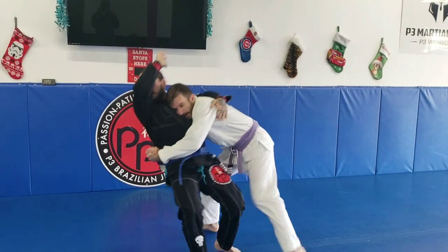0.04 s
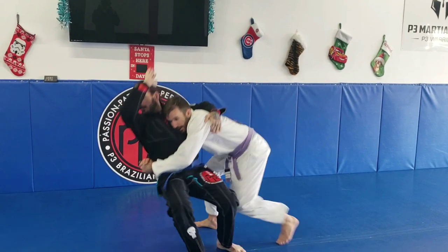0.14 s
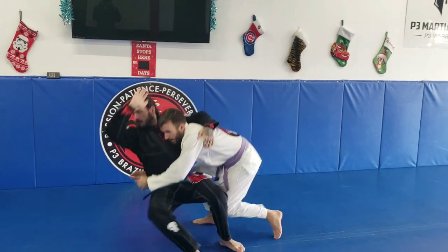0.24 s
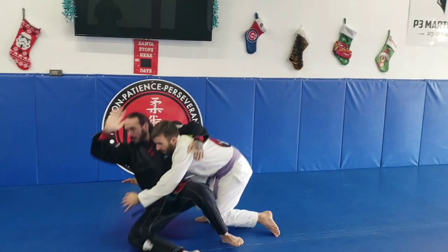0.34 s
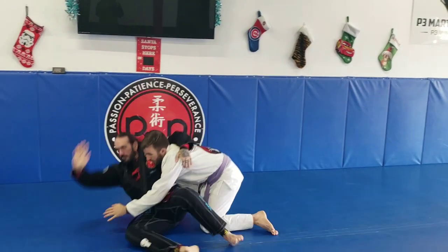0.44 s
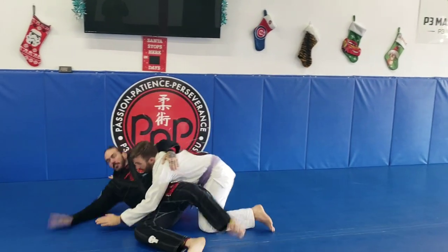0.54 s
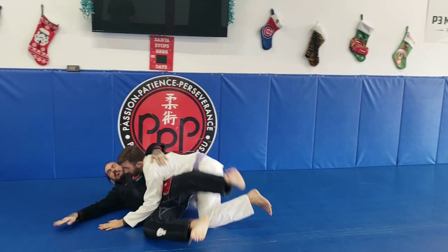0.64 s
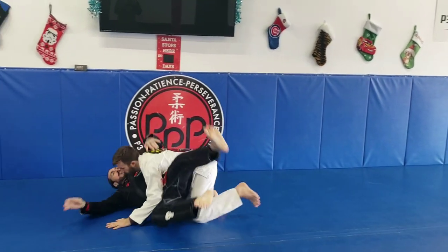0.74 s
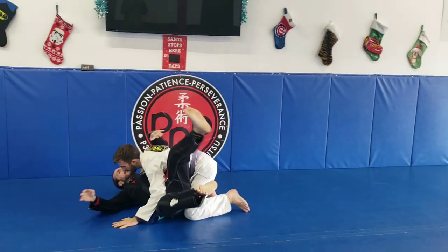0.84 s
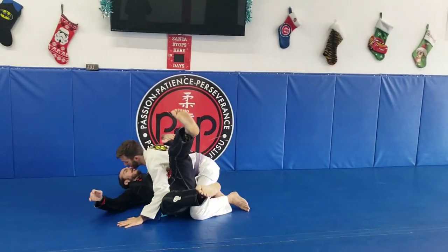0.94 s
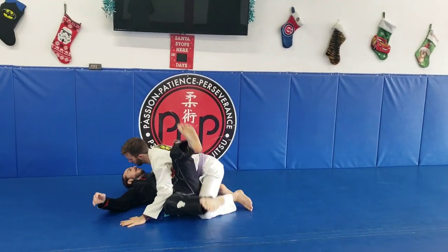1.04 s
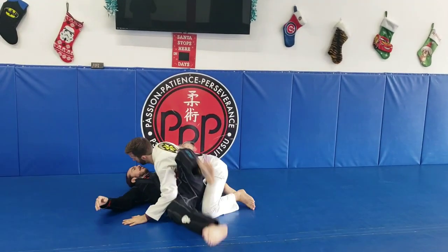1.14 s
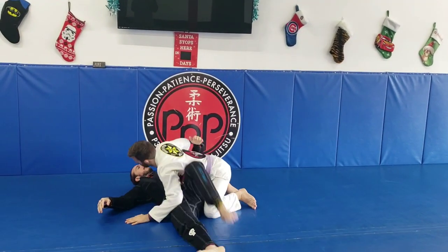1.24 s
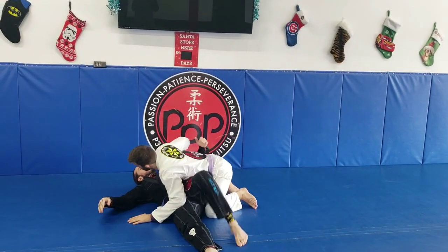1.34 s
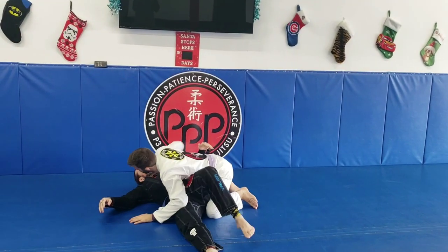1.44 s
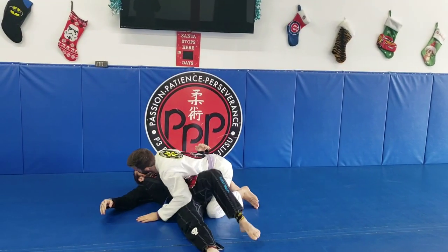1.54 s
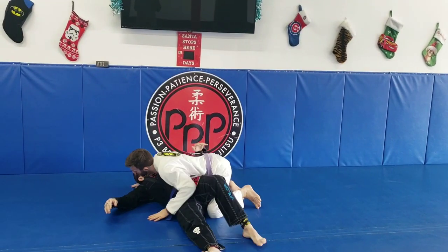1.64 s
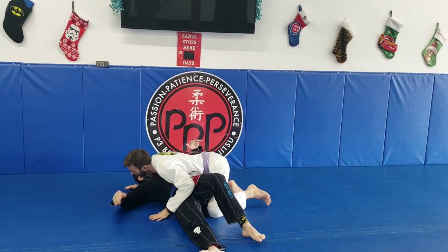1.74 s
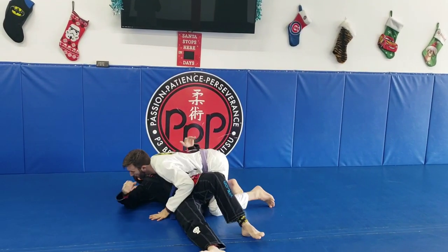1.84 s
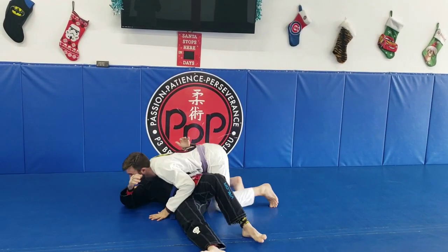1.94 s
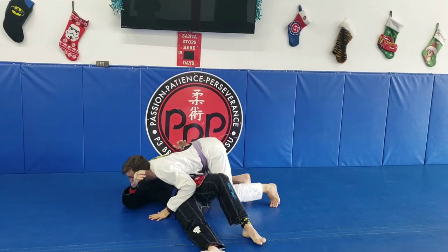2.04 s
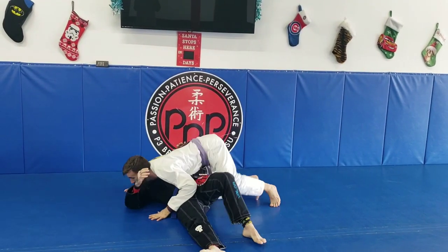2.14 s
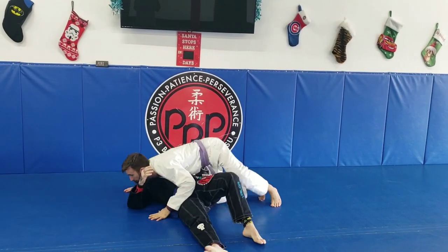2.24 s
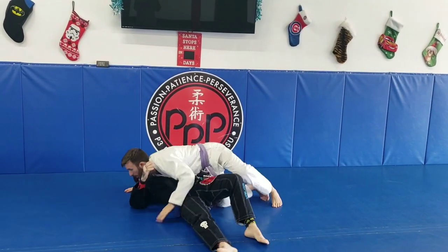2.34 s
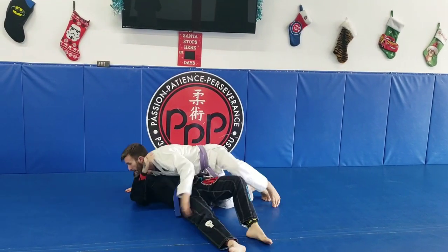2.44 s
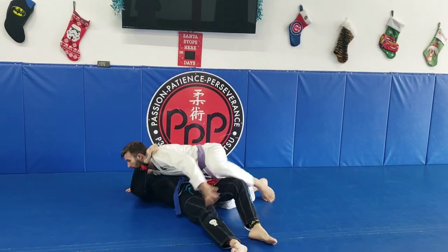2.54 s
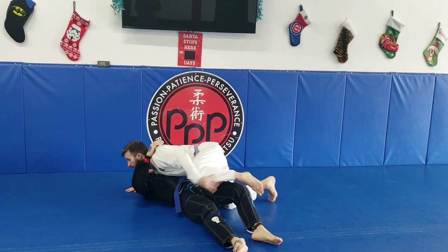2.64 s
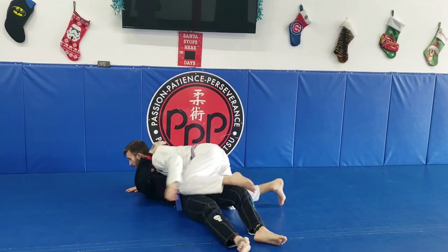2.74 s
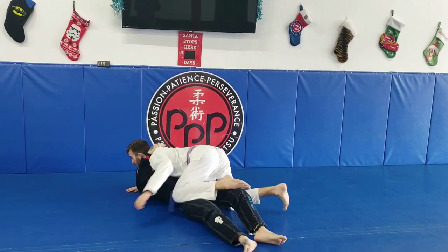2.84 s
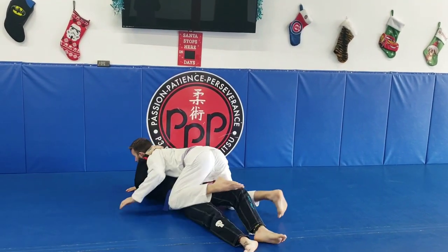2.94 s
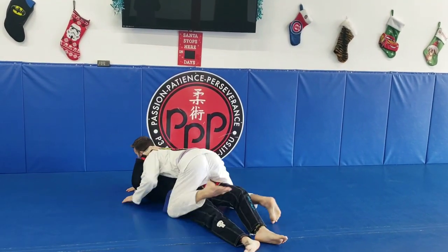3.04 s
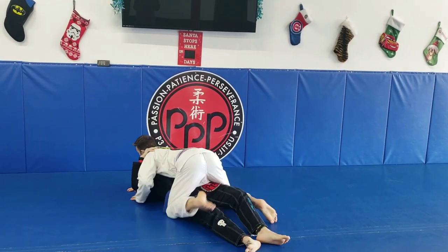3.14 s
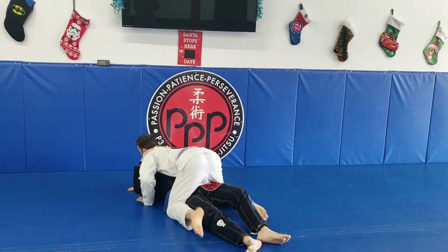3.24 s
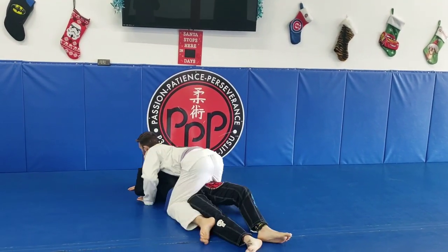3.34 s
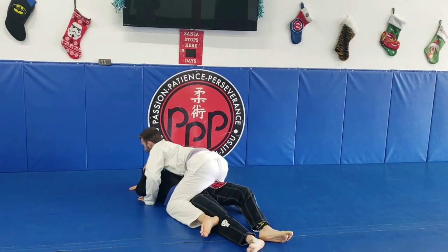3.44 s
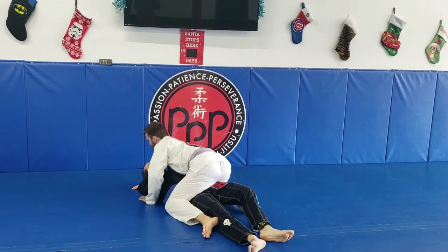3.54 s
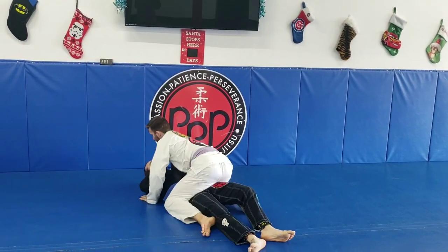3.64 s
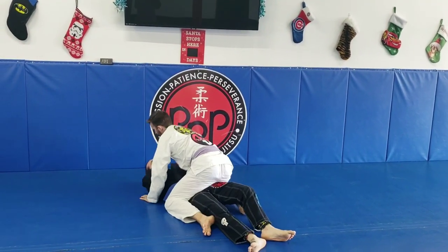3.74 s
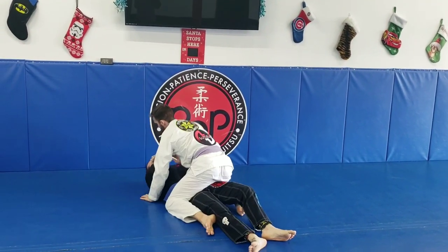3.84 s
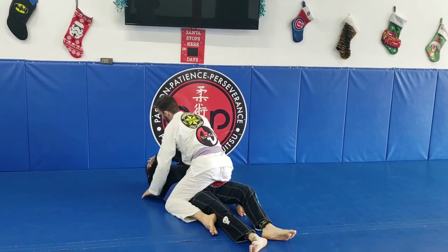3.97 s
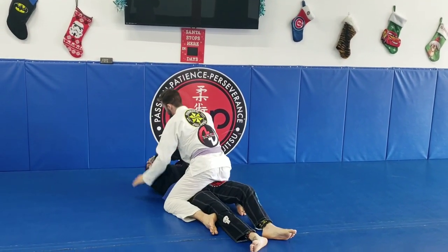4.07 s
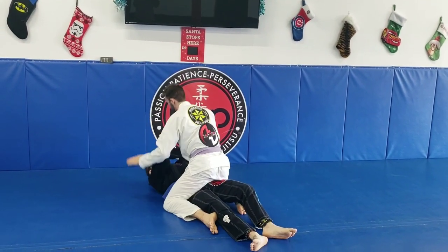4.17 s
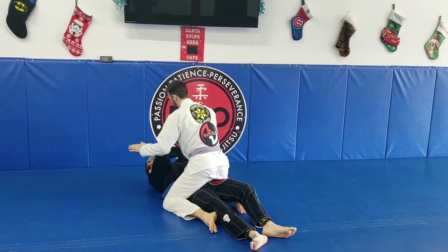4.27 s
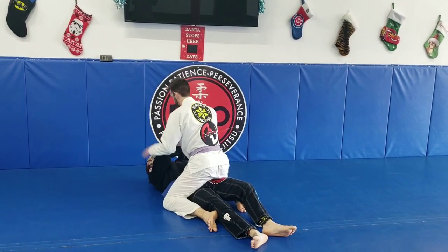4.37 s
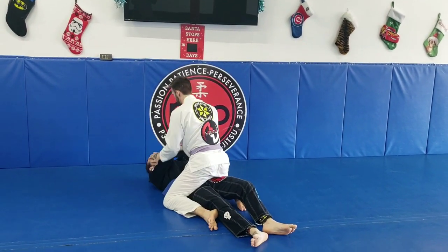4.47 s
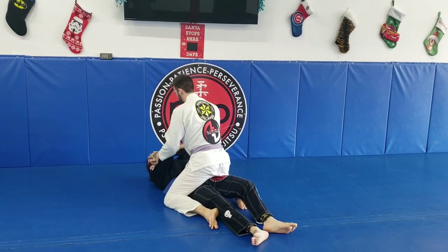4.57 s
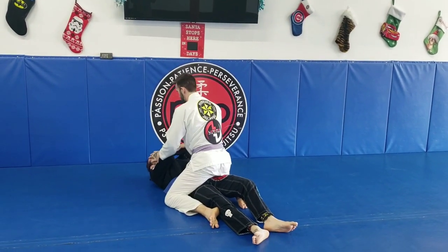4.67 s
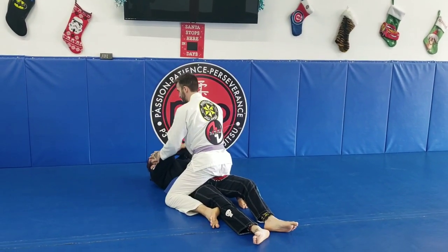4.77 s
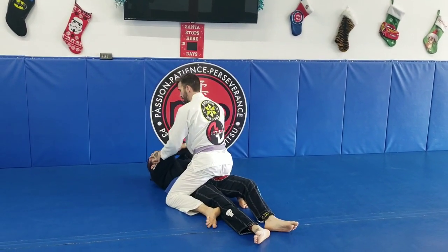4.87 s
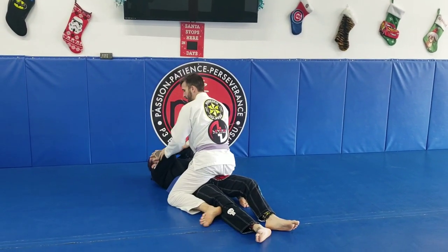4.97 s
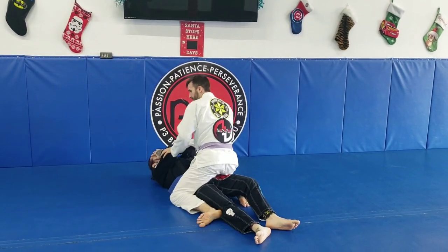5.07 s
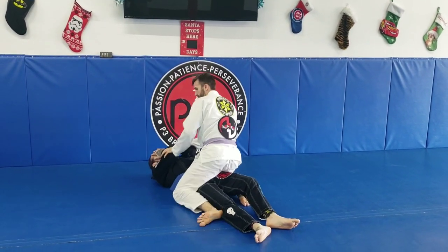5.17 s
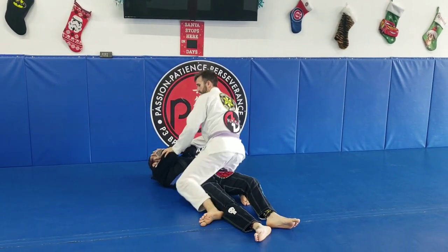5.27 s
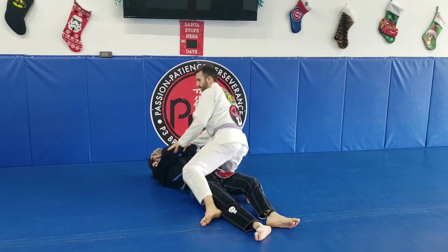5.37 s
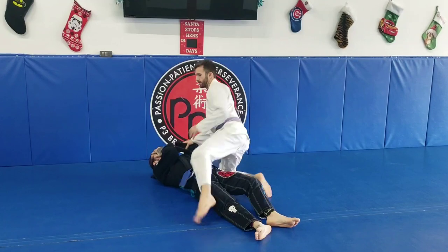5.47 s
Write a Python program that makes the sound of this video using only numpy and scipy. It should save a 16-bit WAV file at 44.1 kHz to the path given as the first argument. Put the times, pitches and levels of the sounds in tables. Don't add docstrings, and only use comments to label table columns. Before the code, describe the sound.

A phone some distance away hears a takedown on a padded sprung floor: soft steps, knee and hip thuds, then one overwhelming slam with a flat arm smack and a boomy hall tail. A double knock comes shortly after, followed by gentle limb taps, short scuffs, sleeves rubbing and hand pats while the bodies shift, over quiet air rumble and hiss.

```python
import sys
import numpy as np
from scipy import signal
from scipy.fft import rfft, irfft, next_fast_len
from scipy.io import wavfile
from scipy.ndimage import uniform_filter1d, map_coordinates

SR = 44100
rng = np.random.default_rng(int(sys.argv[2]) if len(sys.argv) > 2 else 0)


def invert_db(level):
    return 10 ** (np.asarray(level, dtype=float) / 20)


def store_pcm(level_fs):
    pcm = np.round(np.clip(level_fs, -1, 1) * 32767).astype(np.int16)
    wavfile.write(sys.argv[1], SR, np.atleast_2d(pcm).T)


N = 242991

# frequency_hz, level_db (per Hz)
AIR_SPECTRUM = [(15, -39.5), (25, -2.5), (54, -2.5), (86, 4.5), (108, -8.5), (146, -3.5), (168, -15),
                (249, -14), (300, -19), (400, -37), (520, -59), (880, -120)]
# frequency_hz, level_db (per Hz)
HISS_SPECTRUM = [(4410, -32), (7500, -2), (8970, -0.5), (12700, 4), (14000, 1.5), (14800, -11)]
# frequency_hz, level_db (per Hz)
DRAG_SPECTRUM = [(88, -34), (150, 3.5), (361, 0.5), (494, -0.5), (641, -6), (877, -6.5), (1200, -23),
                 (1560, -55.5), (2640, -120)]
# frequency_hz, level_db (per Hz)
CLOTH_SPECTRUM = [(410, -27.5), (700, -7.5), (881, -3.5), (1220, -4.5), (1560, -5), (1850, -6.5),
                  (2030, -7), (3800, -8.5), (6550, -12.5), (8500, -35.5), (11000, -59.5), (18700, -120)]
# frequency_hz, level_db (per Hz)
SKIN_SPECTRUM = [(300, -28.5), (480, 2.5), (700, 0), (1000, -1), (1300, -1.5), (1650, -6.5), (2200, -4),
                 (2800, -6), (4000, -8.5), (6700, -15), (7700, -30), (10500, -24), (12000, -20.5),
                 (14500, -30.5)]
# time_s, cloth_level_db
EFFORT = [(0, -66), (.44, -64.5), (.62, -67), (0.869, -57.5), (1.1, -65.5), (1.29, -71), (1.55, -65.5),
          (1.8, -69.5), (2.101, -68), (2.501, -69.5), (3.198, -70), (3.64, -67), (3.84, -70.5),
          (4.08, -67.5), (4.261, -77.5), (4.47, -83), (4.66, -69.5), (4.85, -78)]
# frequency_hz, t60_s
HALL_T60 = [(60, 0.52), (130, 1), (300, 0.74), (600, 0.38), (1200, 0.8), (2000, .85), (4000, 0.98),
            (6000, 0.76), (9000, 0.57), (14000, 0.44)]
# frequency_hz, gain_db
HALL_GAIN = [(40, -7.5), (70, -1.5), (100, -4.5), (135, 1), (180, 3), (240, 0), (330, 1.5), (450, 2.5),
             (600, -3), (1500, -14), (8000, -1.5)]
# frequency_hz, correlation (-1 to 1)
LIKENESS = [(60, 0.99), (130, 0.94), (290, 0.92), (630, 0.22), (1370, 0.26), (2990, -0.27), (6550, 0.058),
            (14300, -0.2)]
# frequency_hz, left_minus_right_db
PORT_BALANCE = [(60, 3), (110, 1), (200, 1.5), (370, -2), (680, -1), (1260, -5), (2310, -9.5), (4240, -12),
                (7790, -5), (14300, 3)]
# start_s, peak_db, length_s, dullness_db (per octave), hall_db
SLAPS = [
    (0.532, -50.5, 0.0081, -4.5, 6),
    (0.628, -21.5, 0.0066, -2.65, 5.5),
    (1.335, -51, 0.0083, -4.5, 1),
    (2.705, -52, 0.0081, 1.5, 2),
    (5.05, -67, 0.18, -6, 5.5),
    (5.404, -65, 0.16, -5, 4.5),
]
# start_s, peak_db, length_s, dullness_db (per octave), hall_db
SCUFFS = [
    (.055, -51, 0.012, 17, -7),
    (0.168, -49, 0.007, -2.5, 7.5),
    (1.303, -45, 0.01, 0, 6),
    (2.641, -63, 0.06, 4.5, 2.5),
    (3.352, -53.5, 0.12, 4, -5.5),
    (3.933, -59, 0.074, 3, -2.5),
    (4.049, -61.5, 0.018, 9, -3.5),
]
# start_s, peak_db, length_s, dullness_db (per octave), hall_db
PATS = [
    (.4405, -38.5, 0.013, 4.5, 3.5),
    (1.294, -39, 0.007, 4, -2),
    (1.391, -44.5, 0.0078, -3, 5.5),
    (1.704, -53.5, 0.012, -1, 3.5),
    (3.107, -64, .012, 10, 0),
    (4.479, -56.5, 0.04, 1, 11),
    (4.497, -47.5, 0.025, 3, 2),
]
# frequency_hz, level_db, t60_s
FLOOR_MODES = [(103, -13.5, 0.67), (141.2, -15, 1), (255, -12.5, 0.26), (335, -17, .35), (403, -13, 0.24)]
# start_s, peak_db, pitch_hz, boom_db (against the knock), hall_db
LANDINGS = [(0.03, -39.5, 445, -19, 9), (0.149, -35, 325, -7, 7), (0.168, -21, 217, -13, -10.5),
            (0.221, -32.5, 390, -5, 0), (.442, -18.5, 323, -7, 1.5), (0.46, -19, 300, -12.5, -6.5),
            (.525, -19, 308, -11.5, -8), (0.543, -26.5, 272, -22, -5), (0.6279, -2, 260, -11.5, -0.5),
            (.6352, 1, 198, -9.5, 0.5), (.722, -6, 352, -15, -4.5), (1.294, -21, 327, -11.5, 4.5),
            (1.306, -30.5, 298, 6.5, -24), (1.3894, -18, 412, -22.5, -9), (1.407, -18.5, 235, -22, -5)]
# start_s, peak_db, pitch_hz
TAPS = [(1.542, -39.5, 203), (1.7014, -30.5, 284), (2.69, -38, 335), (2.738, -40, 397), (3.108, -43.5, 327),
        (3.312, -47, 290), (3.397, -33, 292), (3.43, -43, 284), (3.919, -37, 348), (4.056, -50, 420),
        (4.488, -34, 203), (5.15, -52, 304), (2.499, -48, 348), (2.586, -46.5, 301), (2.651, -45, 347),
        (5.44, -54, 296)]


def unit(x):
    return x / np.sqrt(np.mean(x ** 2) + 1e-20)


def along(points, hz):
    f, v = np.transpose(points)
    return np.interp(np.log(hz + 1), np.log(f + 1), v)


def add(out, start_s, sound):
    out[:, round(start_s * SR):][:, :sound.shape[-1]] += sound


def filtered(x, response):
    size = next_fast_len(x.shape[-1] + 8192)
    spectrum = rfft(x, size) * response(np.fft.rfftfreq(size, 1 / SR))
    return irfft(spectrum, size)[..., :x.shape[-1]]


def wobble(rate_hz):
    knots = rng.standard_normal(int(N * rate_hz / SR) + 4)
    return map_coordinates(knots, [np.arange(N) * rate_hz / SR])


def diffuse(pair, colour):
    def angle(hz):
        return np.arccos(np.clip(along(LIKENESS, hz), -1, 1)) / 2
    mid, side = filtered(pair, lambda hz: colour(hz) * [np.cos(angle(hz)), np.sin(angle(hz))])
    return np.array([mid + side, mid - side])


def rush(spectrum, patchy_db):
    z = signal.stft(rng.standard_normal((2, N)), nperseg=512)[2]
    patches = uniform_filter1d(rng.standard_normal(z.shape[1:]), size=6, axis=0)
    patches = uniform_filter1d(patches, size=12, axis=1)
    pair = signal.istft(z * invert_db(patchy_db * unit(patches)), nperseg=512)[1][:, :N]
    return unit(diffuse(pair, lambda hz: invert_db(along(spectrum, hz))))


def hall(build_s, colour, gap_s):
    hz, t, z = signal.stft(rng.standard_normal((2, SR)), SR, nperseg=512)
    decay = invert_db(-60 * t / along(HALL_T60, hz)[:, None])
    tail = signal.istft(z * decay, SR, nperseg=512)[1]
    late = np.clip(np.arange(tail.shape[1]) / SR - gap_s, 0, None)
    tail = tail * (1 - np.exp(-late / build_s))
    return diffuse(tail / np.linalg.norm(tail[0]), colour) * (late > 0)


def aftermath(t60_s):
    kicks = np.zeros(N)
    for start_s, peak_db, *_ in LANDINGS:
        kicks[round(start_s * SR)] = invert_db(2 * peak_db)
    return signal.lfilter([1], [1, -invert_db(-120 / (t60_s * SR))], kicks)


def port_hiss():
    return invert_db(-78) * rush(HISS_SPECTRUM, patchy_db=0.9)


def ventilation():
    air_db, rumble_db, rumble_t60_s = -55.5, -30.5, 0.79
    gain = np.sqrt(invert_db(2 * air_db) + invert_db(2 * rumble_db) * aftermath(rumble_t60_s))
    return gain * unit(invert_db(0.9 * wobble(5)) * rush(AIR_SPECTRUM, patchy_db=0.6))


def rubbing():
    drag_db, usual_db, drag_growth = -61.5, -68, 1.7
    shudder_db, shudder_t60_s = -20.5, 0.51
    cloth_right_db = 2
    cloth_db = np.interp(np.arange(N) / SR, *np.transpose(EFFORT))
    move = wobble(4.3)

    drag_power = invert_db(2 * (drag_db + drag_growth * (cloth_db - usual_db)))
    drag_gain = np.sqrt(drag_power + invert_db(2 * shudder_db) * aftermath(shudder_t60_s))
    lumps = invert_db(1.2 * move + 2.2 * wobble(30))
    drag = drag_gain * unit(lumps * rush(DRAG_SPECTRUM, patchy_db=1.5))

    cloth_gain = invert_db(cloth_db + 3 + cloth_right_db * np.array([[-0.5], [0.5]]))
    flutter = invert_db(0.6 * move + 0.8 * wobble(60))
    cloth = cloth_gain * unit(flutter * rush(CLOTH_SPECTRUM, patchy_db=0.9))
    return drag + cloth


def skin(hz, dull_db, pocket_hz, length_s, pocket_db):
    peak_db = pocket_db * np.exp(-(np.log((hz + 1) / pocket_hz) / 0.1) ** 2)
    edge_hz = 11200 + 20000 / (1 + (length_s / 0.008) ** 8)
    tilt_db = dull_db * np.log2((hz + 300) / 2000)
    return invert_db(along(SKIN_SPECTRUM, hz) - tilt_db + peak_db) / (1 + (hz / edge_hz) ** 10)


def contacts():
    kinds = [(SLAPS, 3776, 5.5), (SCUFFS, 1970, 4), (PATS, 1350, 8.5)]
    return sorted((*row, hz, db) for rows, hz, db in kinds for row in rows)


def skin_contacts():
    snap_s, echo_share = 0.001, 0.47
    out, t = np.zeros((2, N + 2 * SR)), np.arange(SR // 2) / SR
    for start_s, peak_db, length_s, dull_db, hall_db, pocket_hz, pocket_db in contacts():
        length_s = max(length_s, 0.002)

        def direct(hz):
            return skin(hz, dull_db, pocket_hz, length_s, pocket_db)

        def echoed(hz):
            return skin(hz, dull_db, pocket_hz, length_s, echo_share * pocket_db)

        rise = np.tanh(t / (snap_s + 9 * length_s ** 2))
        shape = rise * np.exp(-(t / length_s) ** 3)
        noise = unit(diffuse(rng.standard_normal((2, len(t))), direct))
        burst = invert_db(peak_db + 4.5) * noise * shape
        tail = hall(0.0046 + 0.5 * length_s, echoed, gap_s=0.0043)
        add(out, start_s, burst)
        add(out, start_s, invert_db(hall_db) * tail * np.linalg.norm(burst) / np.linalg.norm(tail))
    return out[:, :N]


def push(t, hz, cycles):
    width_s = cycles / hz
    return -np.sin(2 * np.pi * hz * t) * np.exp(-((t - width_s) / (0.8 * width_s)) ** 2)


def impacts():
    bony_db, bony_cycles = -20, 0.1
    falls = [(*row, 0.56 + bony_cycles * max(bony_db - row[-2], 0)) for row in LANDINGS]
    return falls + [(*row, -17.5, -0.9, 0.7) for row in TAPS]


def knocks():
    out, t = np.zeros((2, N + 2 * SR)), np.arange(SR // 2) / SR
    modes = [invert_db(level - 60 * t / t60) * np.sin(2 * np.pi * f * t) for f, level, t60 in FLOOR_MODES]
    ring = sum(modes) * (1 - np.exp(-t / 0.012))
    for start_s, peak_db, pitch_hz, boom_db, hall_db, cycles in impacts():
        knock = push(t, pitch_hz, np.clip(cycles, 0.4, 3))
        boom = invert_db(boom_db + 5.5) * push(t, 105, cycles=0.88)
        thud = invert_db(peak_db) * (knock + boom)[:SR // 20]
        tail = hall(0.0009, lambda hz: invert_db(along(HALL_GAIN, hz)), gap_s=0.0027)
        add(out, start_s, thud)
        add(out, start_s, invert_db(peak_db + boom_db) * ring)
        add(out, start_s, invert_db(hall_db) * signal.fftconvolve(thud[None], tail, axes=1))
    return out[:, :N]


def scene():
    return port_hiss() + ventilation() + rubbing() + skin_contacts() + knocks()


def starved(x):
    mask_db, tilt_db, chance_db = -26.5, 11, 6
    hz, _, z = signal.stft(x, SR, nperseg=2048)
    power = np.abs(z) ** 2
    middle = power[:, (hz > 2000) & (hz < 6500)].mean(axis=(0, 1), keepdims=True)
    strip = np.arange(len(hz)) // 16 * 16
    strip_power = np.abs(uniform_filter1d(power, size=16, axis=1, origin=-8)[:, strip])
    under_db = 10 * np.log10(strip_power / middle + 1e-12)
    scatter_db = chance_db * rng.standard_normal(z.shape[1:])[strip]
    limit_db = mask_db + tilt_db * np.log2(hz[strip, None] / 8000 + 1e-3) + scatter_db
    keep = np.where(hz[:, None] > 7400, 0.5 + 0.5 * np.tanh(under_db - limit_db), 1)
    return signal.istft(z * keep, SR, nperseg=2048)[1][:, :N]


def roll_off(x):
    return signal.sosfilt(signal.butter(12, 14910, fs=SR, output="sos"), x)


def record(dry):
    def response(hz):
        bass_cut = (1j * hz / (40 + 1j * hz)) ** 2
        return invert_db(along(PORT_BALANCE, hz) * [[0.5], [-0.5]]) * bass_cut * (hz < 14700)
    x = filtered(dry, response)
    x = x / (1 + np.abs(x / 1.08) ** 6) ** (1 / 6)
    return roll_off(starved(x))


dry = scene()
out = record(dry)
store_pcm(out)
```